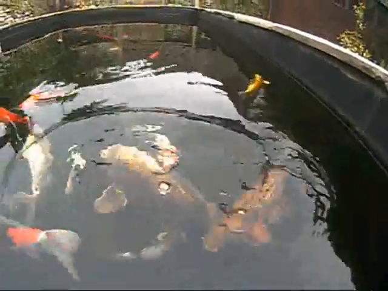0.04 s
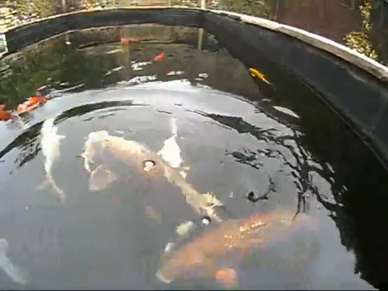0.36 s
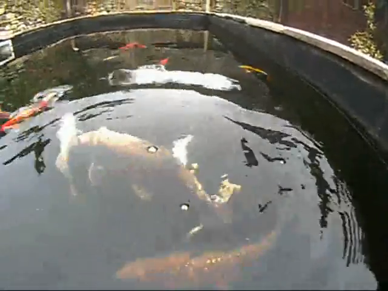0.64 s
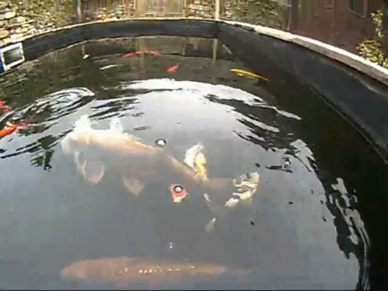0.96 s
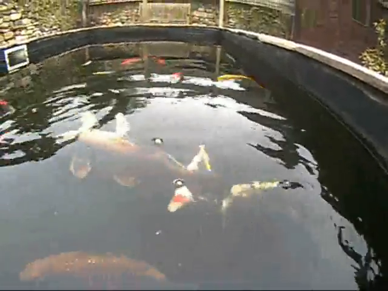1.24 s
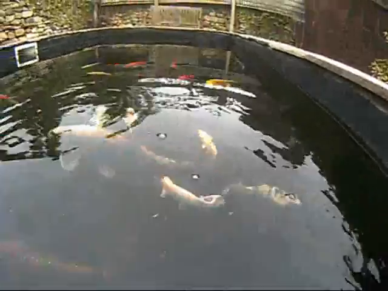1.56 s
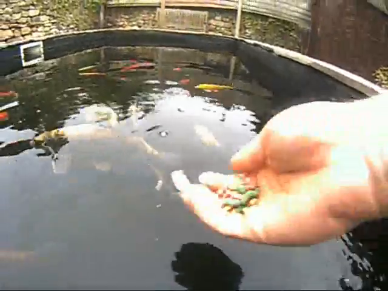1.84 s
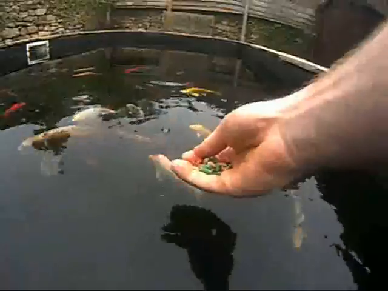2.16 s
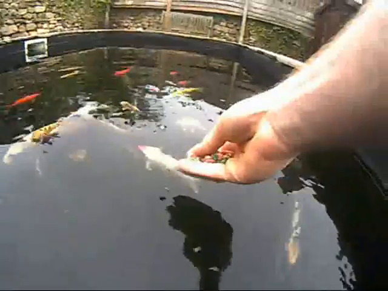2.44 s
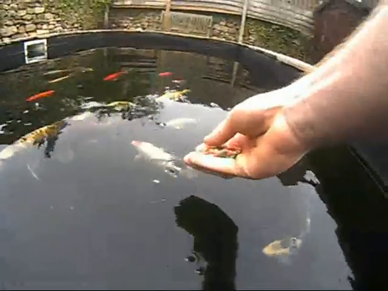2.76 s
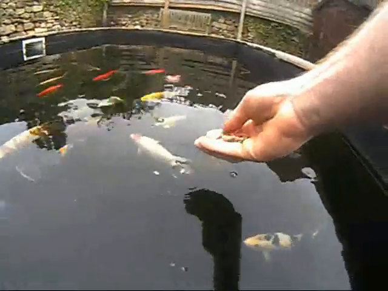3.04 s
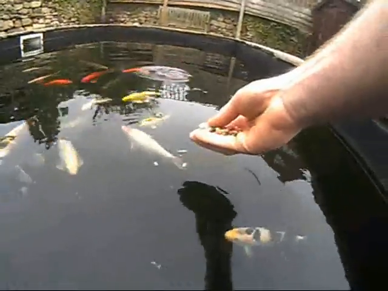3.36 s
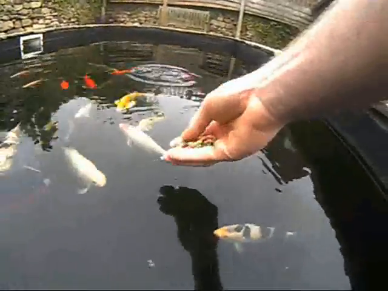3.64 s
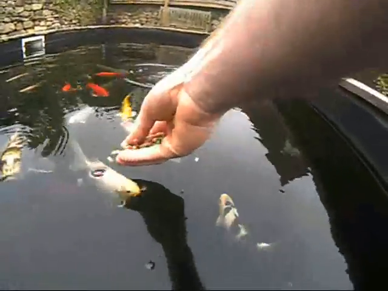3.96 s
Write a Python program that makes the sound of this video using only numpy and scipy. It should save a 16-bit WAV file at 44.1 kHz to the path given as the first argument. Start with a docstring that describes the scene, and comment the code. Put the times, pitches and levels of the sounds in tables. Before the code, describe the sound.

Light, close clicks come in a flurry from the case around the microphone and soon thin out. Steady hiss continues beside a garden pond, with a faint rustle, soft swishes and three small water drips near the end.

```python
"""Small clicks and ticks ring a camera's waterproof case, closed around the microphone.
They come first in a flurry, all sounding the same few case resonances. A soft rustle, dull
bumps and hollow swishes follow, and near the end three drips ring as tiny bubbles.
Under it all lie outdoor wash, a faint rumble, steady hiss and a thin electronic whine."""
import sys
import numpy as np
from scipy import signal
from scipy.fft import rfft, irfft
from scipy.io import wavfile

SR = 44100
rng = np.random.default_rng(int(sys.argv[2]) if len(sys.argv) > 2 else 0)


def inscribe(sig):
    """Save sig as 16-bit PCM at rate SR to the path in sys.argv[1].

    A 1-D sig is mono; a 2-D sig holds one channel per row.
    Samples are clipped to [-1, 1] before scaling.
    """
    pcm = np.round(np.clip(np.atleast_2d(sig).T, -1, 1) * 32767)
    wavfile.write(sys.argv[1], SR, pcm.astype(np.int16))


N = 176400
T = np.arange(N) / SR


def amp(db):
    """Decibels to gain."""
    return 10 ** (np.asarray(db) / 20)


def unit(x):
    """Scales to an rms of one."""
    return x / np.sqrt(np.mean(x ** 2) + 1e-20)


def add(mix, start_s, sound):
    """Mixes a sound in at its start time."""
    part = mix[max(round(start_s * SR), 0):][:len(sound)]
    part += sound[:len(part)]


def noise(colour):
    """Noise coloured by rows of frequency in Hz and level in dB."""
    hz, db = np.transpose(colour)
    shape_db = np.interp(np.log(np.fft.rfftfreq(N, 1 / SR) + 1), np.log(hz), db)
    return unit(irfft(rfft(rng.standard_normal(N)) * amp(shape_db), N))


def drift(rate_hz):
    """Smooth random movement, mostly slower than the given rate."""
    smoothing = np.exp(-(np.fft.rfftfreq(N, 1 / SR) / rate_hz) ** 2)
    return unit(irfft(rfft(rng.standard_normal(N)) * smoothing, N))


def swells(rows):
    """A gain curve of bell-shaped swells."""
    return sum(amp(db) * np.exp(-((T - centre) / half) ** 2 / 2) for centre, half, db in rows)


# Tone of the wash and of the rumble. Each row: frequency in Hz, relative level in dB.
WASH_COLOUR = [(20, 1), (60, 1), (110, -2), (250, -4.5), (500, -3), (850, -3), (1150, 0.5), (1450, 5.5),
               (1850, 1), (2500, 3), (3150, 2), (3700, 6), (4300, 2), (5000, -0.5), (5800, -4.5),
               (9000, -10), (16000, -26.5)]
RUMBLE_COLOUR = [(15, 6.5), (50, -9.5), (110, -10), (200, -23.5), (600, -50)]
# Their fader moves. Each row: time in seconds, level in dB.
WASH_FADER = [(0, -57), (.55, -55), (.9, -55), (1.3, -56.5), (2.0, -56), (2.45, -56.5), (2.85, -55),
              (3.0, -57.5), (3.3, -56.5), (4, -57)]
RUMBLE_FADER = [(0, -80), (.7, -75), (.92, -67), (1.1, -78), (1.7, -73), (2.2, -75), (2.7, -72), (3.1, -76),
                (4, -78.5)]


def outdoor_bed():
    """Outdoor wash comes through the case, wavering gently over a faint, uneven rumble."""
    wash = noise(WASH_COLOUR)
    wash_db = np.interp(T, *np.transpose(WASH_FADER)) + 0.62 * drift(rate_hz=18)
    rumble = noise(RUMBLE_COLOUR)
    rumble_db = np.interp(T, *np.transpose(RUMBLE_FADER)) + 4.5 * drift(rate_hz=16)
    return wash * amp(wash_db) + rumble * amp(rumble_db)


# The case's resonances. Each row: pitch in Hz, relative level in dB, seconds to fall by 60 dB.
CASE_MODES = [(1574, -16.5, 0.022), (2270, -18.5, 0.011), (2630, -9, 0.0086), (2850, -11, 0.012),
              (3850, 1, 0.0092), (4196, -4.5, 0.0083), (4460, -4.5, 0.007), (5010, -8, 0.0076),
              (7370, -18, 0.0066)]
BODY_BELOW_HZ, TREBLE_ABOVE_HZ, LOW_CUT_HZ = 3300, 4700, 1460
DETUNE, RING_ATTACK_S = 0.029, 0.00027


def case_ring(body_db, treble_db):
    """One tick rings the case's modes, each slightly detuned, with the bass cut away."""
    t = T[:SR // 20]
    ring = np.zeros(len(t))
    for (hz, db, t60), chance in zip(CASE_MODES, rng.standard_normal(len(CASE_MODES))):
        db = db + body_db * (hz < BODY_BELOW_HZ) + treble_db * (hz > TREBLE_ABOVE_HZ)
        ring += amp(db - 60 * t / t60) * np.cos(2 * np.pi * hz * (1 + DETUNE * chance) * t)
    attack = 1 - np.exp(-t / RING_ATTACK_S)
    low_cut = signal.butter(2, LOW_CUT_HZ, "high", fs=SR, output="sos")
    return signal.sosfilt(low_cut, ring * attack)


# Case clicks. Each row: start in seconds, relative level in dB, body boost in dB, treble boost in dB.
CASE_CLICKS = [(.0150, -30.5, -1.5, -8), (.0160, -31, 3.5, -9), (0.0374, -38, -1, 13), (0.041, -38, -2, 5),
               (.0464, -45, 6, 0), (0.0566, -34, -8, 3), (0.0608, -27.5, 2.5, -4), (0.0708, -35, 0, -1),
               (.0800, -37, -6, -2), (0.1064, -43, 9, 0), (0.1126, -40, 2, 1), (.1197, -46, 2, 3),
               (.1244, -44, 0, -1), (0.1402, -31, 3.5, 10.5), (.1584, -43, -2, -2), (.1862, -45, 0, 2),
               (0.2707, -25.5, 1, -1), (0.2778, -31, 5.5, 9.5), (.2844, -35.5, 2, -5), (.2952, -41, -3, -3),
               (0.301, -40, -8, -2), (.3084, -40, -6, -3), (.3270, -43, -6, -3), (.3405, -38, -8, -2),
               (.3756, -34, 6.5, 3), (0.4014, -38.5, 9, 11), (.4328, -45, -3, 7), (.4436, -42, 7, 0),
               (.4467, -33.5, -9, 2), (0.4521, -37, -11, 9), (0.4577, -43, 14, -4), (0.469, -38, 0, -1),
               (0.484, -43, 4, -4), (0.491, -43, 0, -2), (.4969, -39, -10, 6), (.5003, -37.5, -8, -4),
               (.5060, -45, -1, -3), (.7477, -47, 6, 14), (.8680, -46, -5, 9), (0.8835, -44, -9, 1),
               (.9168, -50, -3, 2), (3.2190, -45, -2, 4)]
RING_DB, SNAP_DB, SNAP_DECAY_S = 4.5, -6.5, 0.00016
ECHO_S, ECHO_DB, TAIL_DB, TAIL_T60_S = 0.0016, -16, -14, 0.05


def case_clicks():
    """Each click is a bright snap, the case's ring, a reflection inside the case and a short tail."""
    out, t = np.zeros(N), T[:SR // 20]
    for start, db, body_db, treble_db in CASE_CLICKS:
        burst = rng.standard_normal(len(t)) * np.exp(-t / SNAP_DECAY_S)
        snap = amp(db + treble_db + SNAP_DB) * np.diff(burst, prepend=0) / 2
        ring = amp(db + RING_DB) * case_ring(body_db, treble_db)
        scatter = rng.standard_normal(len(t)) * amp(-60 * t / TAIL_T60_S)
        tail = signal.fftconvolve(ring, scatter / np.linalg.norm(scatter))
        add(out, start, ring + snap)
        add(out, start + ECHO_S * rng.uniform(0.765, 1.175), amp(ECHO_DB) * ring)
        add(out, start + ECHO_S, amp(TAIL_DB) * tail)
    return out


def ticks(per_second, layers=8, spread_db=3.5):
    """Tiny random ticks of uneven size ring the case, each layer tuned a little differently."""
    out = np.zeros(N)
    for _ in range(layers):
        sizes = amp(spread_db * np.minimum(rng.exponential(1, N), 4)) * rng.choice([-1, 1], N)
        hits = rng.random(N) < per_second / layers / SR
        out += signal.oaconvolve(sizes * hits, case_ring(body_db=-3, treble_db=0.5))[:N]
    return unit(out)


# Patches of fine crackle. Each row: centre in seconds, half length in seconds, level in dB.
CRACKLE_SWELLS = [(.052, .005, -44), (.12, 0.11, -58), (0.303, 0.025, -59), (.456, 0.013, -47),
                  (.495, 0.017, -52), (1.265, 0.0095, -55.5), (1.79, 0.035, -51), (1.86, 0.046, -55.5)]
STRAY_DB = -67.5


def crackle():
    """Dense ticks swell into brief rustles, with faint strays throughout."""
    return swells(CRACKLE_SWELLS) * ticks(per_second=1800) + amp(STRAY_DB) * ticks(per_second=110)


# Low bumps. Each row: centre in seconds, half length in seconds, level in dB.
BUMP_SWELLS = [(.748, 0.0054, -63), (1.44, 0.034, -65.5), (3.36, 0.07, -71.5)]
# Their dull tone. Each row: frequency in Hz, relative level in dB.
BUMP_COLOUR = [(30, -22), (100, 5), (170, 2.5), (260, -11), (600, -40)]


def bumps():
    """Short swells of bass noise land as soft, dull bumps."""
    return swells(BUMP_SWELLS) * noise(BUMP_COLOUR)


# Soft swishes. Each row: start, peak and end in seconds, level in dB, pitch and bandwidth in Hz.
SWISH_CUES = [(1.345, 1.405, 1.48, -54.5, 1510, 550), (1.434, 1.466, 1.48, -50, 1520, 550),
              (1.62, 1.635, 1.79, -59, 1280, 120), (3.187, 3.208, 3.2, -53.5, 1320, 300),
              (3.275, 3.31, 3.36, -54, 1470, 350), (3.333, 3.391, 3.44, -49, 1466, 240),
              (3.393, 3.444, 3.49, -50, 1600, 402), (3.455, 3.478, 3.525, -50, 1520, 280),
              (3.694, 3.755, 3.78, -61, 4100, 120), (3.83, 3.89, 3.93, -57, 3960, 200)]
# The noise that feeds them. Each row: frequency in Hz, relative level in dB.
SWISH_COLOUR = [(40, -17), (300, -3), (650, 4), (950, 0), (1150, -3), (1400, 0.5), (2000, -1.5), (2400, -4),
                (4000, 3), (7000, -10)]
FLUTTER_DB = 2


def swishes():
    """Fluttering noise swells and drops away in one narrow resonance, hollow when low, thin when high."""
    out = np.zeros(N)
    churn = noise(SWISH_COLOUR) * amp(FLUTTER_DB * drift(rate_hz=110))
    for start, peak, end, db, hz, width in SWISH_CUES:
        hollow = signal.lfilter(*signal.iirpeak(hz, hz / width, fs=SR), churn)
        out += amp(db) * np.interp(T, [start, peak, end], [0, 1, 0]) * unit(hollow)
    return out


# Three drips. Each row: start in seconds, starting pitch in Hz, level in dB,
# seconds to fall by 60 dB, pitch rise in Hz per second.
DRIP_BUBBLES = [(3.2173, 3950, -39, .022, 200000), (3.4216, 4000, -33, 0.014, 10000),
                (3.4628, 3730, -37.5, 0.025, 5000)]
DRIP_ATTACK_S = 0.00066


def drips():
    """Tiny bubbles ring briefly, rising in pitch."""
    out, t = np.zeros(N), T[:SR // 20]
    attack = 1 - np.exp(-t / DRIP_ATTACK_S)
    for start, hz, db, t60, rise in DRIP_BUBBLES:
        cycles = hz * t + rise * t ** 2 / 2
        add(out, start, amp(db - 60 * t / t60) * attack * np.sin(2 * np.pi * cycles))
    return out


def scene():
    """All sources reach one microphone, the same in both channels."""
    mono = case_clicks() + drips() + crackle() + swishes() + bumps() + outdoor_bed()
    return np.tile(mono, (2, 1))


# Microphone hiss. Each row: frequency in Hz, relative level in dB.
HISS_COLOUR = [(20, -6), (1000, -6), (3500, -2.5), (6500, 1), (9000, 0.5), (12000, -.5), (14000, 0.5),
               (16000, 0.5)]
# Thin electronic whine. Each row: pitch in Hz, rms level in dB.
WHINE_TONES = [(10204, -84), (10282, -80), (14084, -84), (14723, -89), (15074, -65.5), (15165, -85)]
HISS_DB, HIGH_CUT_HZ = -52.5, 15800


def record(dry):
    """The electronics add hiss and whine, then a steep filter takes off the very top."""
    whine = sum(amp(db) * np.sqrt(2) * np.sin(2 * np.pi * (hz * T + rng.random()))
                for hz, db in WHINE_TONES)
    hiss = amp(HISS_DB) * noise(HISS_COLOUR)
    high_cut = signal.firwin(601, HIGH_CUT_HZ, window=("kaiser", 8), fs=SR)
    return signal.oaconvolve(dry + hiss + whine, high_cut[None], "same")


dry = scene()
out = record(dry)
inscribe(out)
```